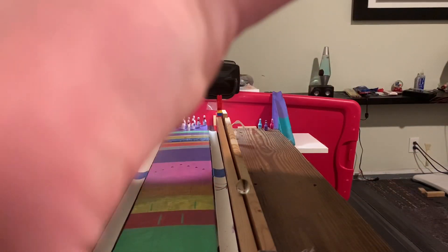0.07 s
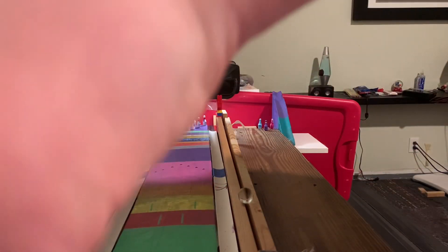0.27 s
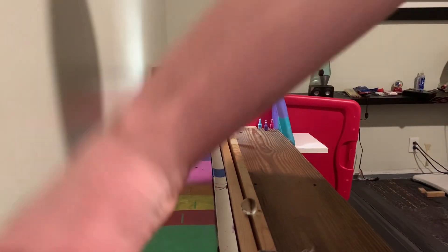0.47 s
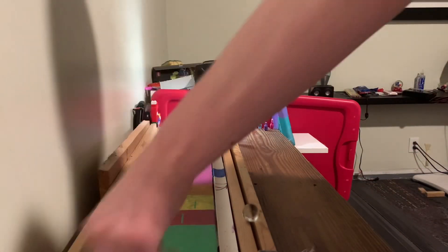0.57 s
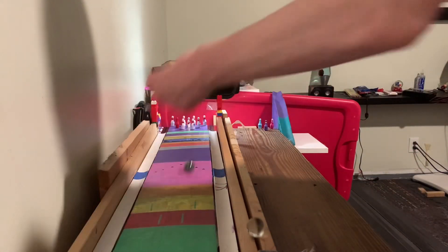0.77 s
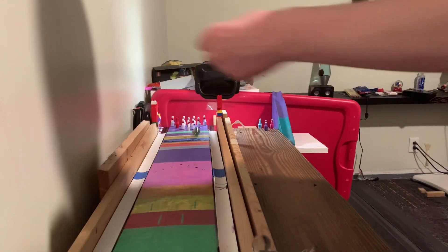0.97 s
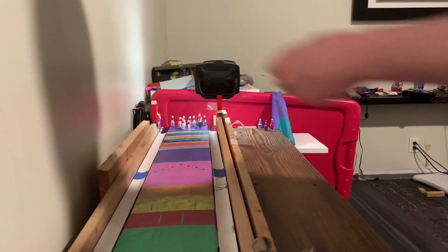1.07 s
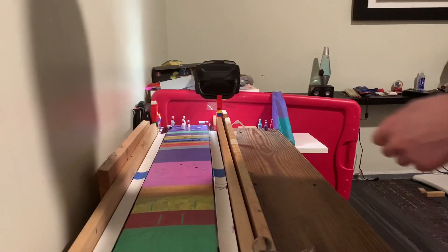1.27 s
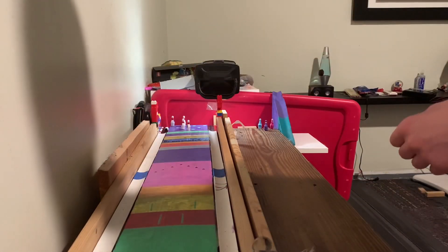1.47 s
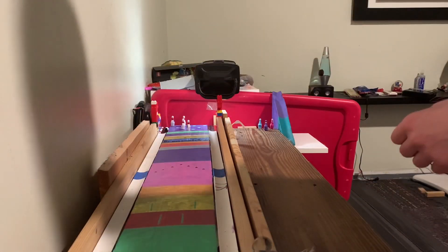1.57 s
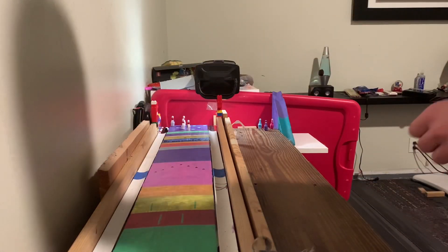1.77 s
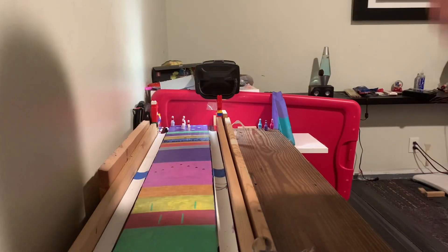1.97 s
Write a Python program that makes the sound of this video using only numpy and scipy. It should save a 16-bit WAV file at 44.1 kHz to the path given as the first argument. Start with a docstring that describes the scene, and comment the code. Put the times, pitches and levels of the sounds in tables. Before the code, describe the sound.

A marble strikes miniature metal pins in a quiet room. Faint ticks from another marble on a side rail come from 0.1 to 0.6 s over low hum. At 0.6 s a steel marble raps onto the nearby wooden lane, bouncing and rolling away. From 1.0 s pins crack, thud against the back box and ring high, thinning by 1.7 s into faint hiss; a dull tock follows at 1.9 s.

```python
"""A quiet room hums (shaped noise) and a second marble ticks on the side rail (noise cracks and rings).
After a short noise swell a steel marble lands on a wooden lane, bounces and rolls away from a phone.
It knocks down small metal pins: noise cracks, thuds in the back box, clatter and rings near 9.6 kHz (fading tones).
A thin high hiss (shaped noise) lies under the end of the clatter, and one dull tock (fading tones) follows.
Two microphone ports hear it all with different phase, along with the room's echo."""
import sys
import numpy as np
from scipy import signal
from scipy.fft import rfft, irfft, next_fast_len
from scipy.io import wavfile

SR = 44100
rng = np.random.default_rng(int(sys.argv[2]) if len(sys.argv) > 2 else 0)


def wrap_up_sound(samples):
    """Save the sound to the file named by the first command line argument, as 16-bit audio."""
    columns = np.atleast_2d(samples).T
    # keep every value between -1 and 1, then stretch to whole-number steps
    tamed = np.clip(columns, -1, 1)
    steps = np.round(tamed * 32767).astype(np.int16)
    wavfile.write(sys.argv[1], SR, steps)


def gain_from_db(level_db):
    """Turn a decibel level (scalar or array-like) into a linear amplitude factor."""
    decades = np.asarray(level_db, float) / 20
    return 10 ** decades


N = 88817
T = np.arange(N) / SR  # time of every sample, in s

# In these tables, t60_s is the time a sound takes to fall by 60 dB.
# steady room hum: overall tone colour (pitch_hz, level_db)
HUM_COLOUR = [(15, -61.5), (25, -30.5), (44, 5), (123, 4), (145, -6.5), (285, -1.5), (317, -45),
              (363, -38.5), (394, -9.5), (911, -17), (1650, -28.5), (16000, -57)]
# narrow bands in the hum (pitch_hz, width_hz, level_db, waver_db)
HUM_BANDS = [(57.3, 5.2, -43, 1.5), (107, 36, -56, -3.5), (281.5, 16.4, -56.5, 3.5), (362, 44, -60, 0),
             (900, 18, -63, 2)]
# how alike left and right hum are; below 0 counts as 0 (pitch_hz, likeness from 0 to 1)
HUM_ALIKE = [(60, 0.7), (130, 1), (290, 0.33), (640, 0.07), (1410, -0.16), (3100, 0.08), (6820, -0.18),
             (15000, 0.22)]
# second marble on the side rail (start_s, level_db, pitch_hz)
RAIL_TICKS = [(0.1141, -39, 3100), (0.304, -64.5, 3220), (0.462, -47.5, 4390), (0.558, -55, 5900),
              (0.588, -45.5, 3940)]
# tones in a rail tick (multiple of its pitch, level_db, t60_s)
TICK_TONES = [(1, -4, 0.066), (1.419, -5, 0.034), (2.2, -11, 0.025)]
# tone colour of the noise swell before the first bounce (pitch_hz, level_db)
LEAD_IN_COLOUR = [(700, -35), (1300, 7), (1550, -11), (1900, 1), (3500, -22.5), (6000, -58)]
# loudness of the rolling marble over time (time_s, level_db)
ROLL_LEVEL = [(.614, -20), (.63, -34.5), (.68, -39), (.75, -42.5), (.85, -40), (.95, -42), (1.05, -43)]
# tones the lane board rings with (pitch_hz, level_db, t60_s)
LANE_TONES = [(376.8, -6, 0.077), (480, -9, 0.06), (522, -5.5, 0.045), (601.6, 0, 0.036), (760, 0, 0.029),
              (861, 2, 0.025), (953, 2, 0.024), (1100, 2.5, 0.056), (1140, -20, 0.03), (1460, 2.5, 0.076),
              (1549, 4, 0.072), (1957, 4.5, 0.015), (1920, -22.5, 0.0093), (2567, -1.5, 0.014),
              (2910, -25, 0.033), (2300, -7.5, 0.022)]
# tone colour of the noisy part of a lane contact (pitch_hz, level_db)
LANE_GRIT = [(300, 9), (1000, 9.5), (2500, -10), (3500, -22), (4700, -24.5), (7000, -37), (10000, -43.5),
             (16000, -35.5)]
# marble bounces on the lane (start_s, level_db, contact_ms, favoured_pitch_hz, grit_level_db)
BOUNCES = [(0.6157, -7.5, 0.085, 2300, -15.5), (0.6165, -6.5, 0.27, 480, -37),
           (0.6204, -36, 0.56, 507, -43), (0.6635, -14, 0.21, 918, -13.5), (0.7015, -19, 0.27, 770, -13.5),
           (.710, -22, 0.26, 607, -42), (.7195, -27, 0.36, 760, -34), (.740, -20, 0.48, 836, -14),
           (.778, -24, 0.17, 760, -37), (0.8072, -15, 0.36, 813, -16.5), (0.8351, -21.5, 0.19, 1017, -32),
           (0.854, -39, 0.15, 1000, -16.5), (.873, -30, 0.33, 800, -49), (0.900, -22.5, 0.42, 700, -26.5),
           (0.919, -37.5, 0.28, 700, -39), (.933, -28.5, 0.21, 1100, -35)]
# hard cracks of marble and pins meeting (start_s, level_db, pitch_hz)
CRACKS = [(0.9894, -17, 2300), (0.995, -42, 3000), (1.01, -28, 8000), (1.0376, -3, 8640),
          (1.0531, -3.5, 6940), (1.084, -38, 6870), (1.11, -6.5, 6640), (1.119, -1.5, 9060),
          (1.1809, -5, 14000), (1.1887, -10, 9100), (1.213, -28, 2530), (1.223, -13, 2530),
          (1.239, -17.5, 7100), (1.381, -21, 5400), (1.395, -11.5, 1820), (1.4794, -25, 5700),
          (1.497, -18, 4240), (1.512, -42, 1980), (1.551, -22, 9100), (1.5752, -18, 2940),
          (1.594, -24, 4240), (1.613, -17, 3860), (1.6523, -17.5, 3000)]
# short body tones of a pin knocking on wood (pitch_hz, level_db, t60_s)
PIN_BODY = [(1100, 3, 0.022), (1820, 11.5, 0.01), (2300, -3.5, 0.018), (2912, 4, 0.028), (3650, -5, 0.025),
            (4240, -9, 0.067), (4824, -5, 0.035), (5646, -4.5, .025), (6540, -1, 0.015)]
# blows on the back box (start_s, level_db, contact_ms, favoured_pitch_hz)
THUDS = [(0.9917, -27.5, 0.4, 850), (1.0434, -21.5, 0.89, 480), (1.047, -14, 0.56, 480),
         (1.1104, -3.5, 0.13, 696), (1.113, -14, 1.02, 197), (1.119, -13.5, 0.47, 500),
         (1.187, -8, 0.25, 900), (1.198, -14, 0.48, 630), (1.203, -10.5, 0.21, 500),
         (1.214, -18, 0.32, 1160), (1.227, -17.5, 0.15, 780), (1.222, -22.5, 1.7, 65),
         (1.242, -49, 0.17, 610), (1.248, -15, 1, 100), (1.262, -24, 1.11, 206), (1.282, -30.5, 0.71, 110),
         (1.299, -23.5, 0.59, 190), (1.315, -50, 0.22, 240), (1.3964, -20.5, 0.18, 503),
         (1.467, -25, 0.17, 710), (1.514, -38, 0.42, 1000), (1.819, -39, 1.24, 289),
         (1.829, -42.5, 1.2, 290), (1.576, -38, 0.15, 1800), (1.655, -38, 0.26, 1310)]
# tones the back box rings with (pitch_hz, level_db, t60_s)
BOX_TONES = [(65, -39, 0.088), (98, -3, 0.063), (190, -6, 0.037), (264, -15, 0.092), (308.4, -17, 0.12),
             (476, 5, 0.025), (630, -0.5, 0.019), (728, 2, 0.043), (902, -2.5, 0.039), (1000, -5.5, 0.065),
             (1087, 1.5, 0.034), (1226, 0, 0.14), (1420, -2.5, 0.045), (1602, 2, 0.021), (1825, 4.5, 0.09),
             (2300, -20, 0.021)]
# loudness of pins tumbling and rolling over time (time_s, level_db)
CLATTER_LEVEL = [(1.036, -38.5), (1.05, -36), (1.10, -38), (1.125, -21.5), (1.17, -34), (1.2, -17.5),
                 (1.25, -26), (1.3, -34), (1.4, -33), (1.55, -36.5), (1.66, -38), (1.75, -44),
                 (1.85, -54.5), (1.93, -57.5), (2.014, -48.5)]
# tone colour of the clatter noise (pitch_hz, level_db)
CLATTER_COLOUR = [(80, -30), (150, 2), (300, 1.5), (700, 1.5), (1500, 0.5), (3000, -3.5), (5000, -10.5),
                  (7000, -15), (11000, -17), (15500, -18.5), (16500, -16.5)]
# tones a metal pin rings with (pitch_hz, level_db, t60_s)
PIN_TONES = [(9571, 0, 0.11), (8720, -24, 0.012), (9545, -5, 0.09), (9800, -22, 0.02), (9620, -7, .07),
             (6500, -11, 0.01), (10900, -14, 0.012), (15100, -8, .012)]
# single pin rings (start_s, level_db)
PIN_RINGS = [(1.0378, -18.5), (1.0505, -10), (1.069, -20.5), (1.084, -18.5), (1.1095, -28), (1.12, -37),
             (1.151, -35), (1.1817, -17.5), (1.196, -17.5), (1.213, -44), (1.239, -12), (1.249, -19),
             (1.273, -19), (1.304, -33), (1.345, -41), (1.385, -40), (1.415, -37), (1.444, -28.5),
             (1.511, -27), (1.5505, -25.5), (1.597, -39), (1.6205, -22)]
# loudness of the thin high hiss over time (time_s, level_db)
HISS_LEVEL = [(1.55, -46), (1.72, -43), (1.9, -53), (1.94, -56), (2.014, -86)]
# tone colour of that hiss (pitch_hz, level_db)
HISS_COLOUR = [(2000, -19.5), (5000, -2), (8000, 7), (15500, 1.5)]
# one dull tock (start_s, level_db)
TOCK = [(1.9277, -25)]
# tones in the tock (pitch_hz, level_db, t60_s)
TOCK_TONES = [(760, -9, 0.14), (937, 5.5, 0.042), (1160, 1, 0.025), (1430, 17, 0.01), (1590, -16, 0.0099)]
# how long the room's echo lasts (pitch_hz, t60_s)
ROOM_T60 = [(100, 0.34), (500, 0.33), (2000, 0.41), (6000, 0.63), (12000, 0.12)]
# how alike left and right echo are (pitch_hz, likeness from 0 to 1)
ROOM_ALIKE = [(100, 0.99), (300, 0.8), (800, 0.11), (2000, 0.02), (8000, 0)]
# phase lead of the first port over the second (pitch_hz, phase_rad)
PORT_PHASE = [(100, 0), (500, 0.5), (1800, 1.44), (4000, 1.51), (9600, 1.84), (15000, 1.8)]
# level of the first port over the second (pitch_hz, level_db)
PORT_BALANCE = [(100, 1.5), (300, 2.5), (700, 5), (1500, 4), (4000, -2), (8000, -0.5), (15000, 1)]
# treble dips and top cut of the finished sound (pitch_hz, level_db)
FINAL_COLOUR = [(7300, 0.5), (8000, -9.5), (8800, -16.5), (9300, 3), (12000, 2), (12800, -12), (14000, -3),
                (14800, -11), (15700, 7), (16200, -49)]


def table(points, hz):
    """Reads a value at each pitch from (pitch, value) points on a log pitch axis."""
    p = np.array(points, float)
    return np.interp(np.log(np.maximum(hz, 1)), np.log(p[:, 0]), p[:, 1])


def curve(rows):
    """Turns (time, dB) rows into a gain over time, practically silent outside them."""
    p = np.array(rows, float)
    return gain_from_db(np.interp(T, p[:, 0], p[:, 1], left=-120, right=-120))


def unit(x):
    """Scales a sound to an rms (average strength) of 1."""
    return x / np.sqrt(np.mean(x ** 2))


def colour(x, points):
    """Filters a sound by (pitch, dB) points."""
    n = x.shape[-1]
    return irfft(rfft(x) * gain_from_db(table(points, np.fft.rfftfreq(n, 1 / SR))), n)


def fade(t, t60):
    """Natural dying away: the level falls 60 dB in t60 seconds."""
    return np.exp(-np.log(1000) * t / t60)


def pair(size, alike):
    """Left and right noise, mixed from shared and opposite parts to be more or less alike at each pitch."""
    likeness = np.clip(table(alike, np.fft.rfftfreq(size, 1 / SR)), 0, 1)
    mid, side = rfft(rng.standard_normal((2, size)))
    mid, side = mid * np.sqrt(1 + likeness), side * np.sqrt(1 - likeness)
    return irfft(np.array([mid + side, mid - side]) / 2, size)


def favour(tones, hz, db, width_oct):
    """Extra dB for the tones near the pitch a blow favours."""
    return db * np.exp(-(np.log2(np.array(tones)[:, :1] / hz) / width_oct) ** 2)


def ring(tones, contact_ms, extra_db=0, spread=0.042, scatter_db=2, size=SR // 4):
    """One blow, peak 1: fading tones, slightly random in pitch and level; a longer contact dulls them."""
    rise_s = 0.00027
    hz, db, t60 = np.array(tones, float).T[:, :, None]
    t = T[:size]
    level_luck, pitch_luck = rng.standard_normal((2, len(hz), 1))
    sign = (-1.) ** np.arange(len(hz))[:, None]  # neighbouring tones start in opposite directions
    gain = sign * gain_from_db(db + extra_db + scatter_db * level_luck)
    waves = np.sin(2 * np.pi * hz * (1 + spread * pitch_luck) * t)
    body = (1 - np.exp(-t / rise_s)) * np.sum(gain * waves * fade(t, t60), 0)
    # the contact is a smooth bell-shaped push
    push = np.exp(-.5 * ((T[:300] * 1000 - 1.5 * contact_ms) / (.5 * contact_ms + 1e-3)) ** 2)
    y = signal.fftconvolve(body, push)
    return y / np.abs(y).max()


def burst(points, t60):
    """A short noise crack with a quick rise and a fade; peak roughly 1."""
    t, rise_s = T[:4096], .0007
    noise = unit(colour(rng.standard_normal(4096), points))
    return noise * fade(t, t60) * (1 - np.exp(-t / rise_s)) / 2


def add(out, s, y):
    """Mixes y in at s seconds."""
    i = int(s * SR)
    out[i:i + len(y)] += y[:len(out) - i]


def grains(per_s, scatter_db):
    """Random clicks of uneven but bounded size; rms 1."""
    hit = rng.random(N) < per_s / SR
    sign = np.sign(rng.standard_normal(N))
    size = gain_from_db(scatter_db * np.minimum(rng.exponential(size=N), 3))
    return unit(hit * sign * size)


def ring_clicks(clicks, body):
    """Lets every click set off the same ring, scaled to unit energy."""
    return signal.fftconvolve(clicks, body / np.linalg.norm(body))[:N]


def patter(clicks, points, t60):
    """Coloured noise that jumps up at every click and fades, like many small puffs."""
    puff = fade(T[:2048], t60)
    power = signal.fftconvolve(clicks ** 2, puff ** 2 / np.sum(puff ** 2))[:N]
    shape = np.sqrt(np.maximum(power, 0))
    y = colour(shape * rng.standard_normal(N), points)
    return y * np.linalg.norm(shape) / np.linalg.norm(y)


def pin_knock(hz, contact_ms, size=SR // 4):
    """A pin knocks on wood: its short body tones ring, strongest near one pitch."""
    return ring(PIN_BODY, contact_ms, favour(PIN_BODY, hz, 23.5, .25), spread=0.0284, size=size)


def hum():
    """Steady room noise with a few narrow bands whose loudness wavers, the same in both ports."""
    hum_db, waver_s = -47.5, .06
    out = gain_from_db(hum_db) * unit(colour(pair(N, HUM_ALIKE), HUM_COLOUR))
    f = np.fft.rfftfreq(N, 1 / SR)
    for hz, width, db, waver_db in HUM_BANDS:
        waver = unit(irfft(rfft(rng.standard_normal(N)) * np.exp(-(f * waver_s) ** 2), N))
        band = unit(irfft(rfft(rng.standard_normal(N)) * np.exp(-((f - hz) / width) ** 2), N))
        out = out + gain_from_db(db + waver_db * waver) * band
    return out


def rail_ticks():
    """A second marble ticks along the side rail: faint noise cracks, each with a softer ring."""
    ring_db = -10  # against the crack
    out = np.zeros(N)
    for s, db, hz in RAIL_TICKS:
        add(out, s, gain_from_db(db) * burst([(hz / 4, -30), (hz, 0), (hz * 2, -8), (16000, -14)], t60=0.026))
        tones = np.array(TICK_TONES) * [hz, 1, 1]
        add(out, s, gain_from_db(db + ring_db) * ring(tones, 0.042, spread=0.0056))
    return out


def lead_in():
    """A short noise swell, mostly 1 to 2 kHz, that stops just before the first bounce."""
    stop_s, rise_s, level_db = .6145, 0.005, -22.5
    noise = unit(colour(rng.standard_normal(N), LEAD_IN_COLOUR))
    return gain_from_db(level_db) * noise * np.exp(-np.abs(T - stop_s) / rise_s) * (T < stop_s)


def rolling():
    """The marble rolls: many tiny bumps ring the board and stir up gritty noise."""
    grit_db = 3  # against the bumps
    bumps = grains(per_s=900, scatter_db=2.5) * curve(ROLL_LEVEL)
    rung = ring_clicks(bumps, ring(LANE_TONES, contact_ms=.55))
    return rung + gain_from_db(grit_db) * patter(bumps, LANE_GRIT, t60=0.029)


def bounces():
    """Each bounce rings the lane board, with a gritty noise edge."""
    out = np.zeros(N)
    for s, db, ms, hz, grit_db in BOUNCES:
        extra = favour(LANE_TONES, hz, 18, .55)
        add(out, s, gain_from_db(db) * ring(LANE_TONES, ms, extra, spread=.012))
        add(out, s, gain_from_db(grit_db) * burst(LANE_GRIT, t60=0.029))
    return out


def cracks():
    """Marble and pins meet hard: a noise crack around one pitch, with a softer pin knock."""
    knock_db = -18  # against the crack
    out = np.zeros(N)
    for s, db, hz in CRACKS:
        shape = [(hz / 16, -56), (hz / 2, -7), (hz, 0), (hz * 16, -28)]
        add(out, s, gain_from_db(db) * burst(shape, t60=0.021))
        add(out, s, gain_from_db(db + knock_db) * pin_knock(hz, 0.046))
    return out


def thuds():
    """Marble and pins hit the back box, and each blow rings its wide, dull tones."""
    out = np.zeros(N)
    for s, db, ms, hz in THUDS:
        add(out, s, gain_from_db(db) * ring(BOX_TONES, ms, favour(BOX_TONES, hz, 10, 1.2), spread=0.044))
    return out


def clatter():
    """Pins tumble: dense knocks stir up noise and faintly ring the metal, the ring ending near 1.7 s."""
    ring_db, stop_s, stop_fade_s = -29, 1.7, .05
    knocks = grains(per_s=700, scatter_db=3.5) * curve(CLATTER_LEVEL)
    ringing_knocks = knocks / (1 + np.exp((T - stop_s) / stop_fade_s))
    bell = ring(PIN_TONES[:5], 0.048, spread=0.0012)
    return patter(knocks, CLATTER_COLOUR, t60=.02) + gain_from_db(ring_db) * ring_clicks(ringing_knocks, bell)


def pin_rings():
    """Single pins ring: a very short contact sets off their high tones."""
    out = np.zeros(N)
    for s, db in PIN_RINGS:
        add(out, s, gain_from_db(db) * ring(PIN_TONES, 0.033, spread=0.0012, scatter_db=3))
    return out


def rattle():
    """Sparse small knocks at random times, each favouring a random body tone of a pin."""
    per_s, scatter_db = 110, 4
    out, gain = np.zeros(N), curve(CLATTER_LEVEL)
    times = np.cumsum(rng.exponential(1 / per_s, 400)) + CLATTER_LEVEL[0][0]
    for s in times[times < T[-1]]:
        hz = PIN_BODY[rng.integers(len(PIN_BODY))][0]
        loudness = gain_from_db(scatter_db * min(rng.exponential(), 3)) * gain[int(s * SR)]
        add(out, s, loudness * pin_knock(hz, 0.057, size=2048))
    return out


def hiss():
    """A thin, fading high hiss under the end of the clatter, made of coloured noise."""
    return curve(HISS_LEVEL) * unit(colour(rng.standard_normal(N), HISS_COLOUR))


def tock():
    """One dull tock: a blow on a few quickly fading tones."""
    out = np.zeros(N)
    for s, db in TOCK:
        add(out, s, gain_from_db(db) * ring(TOCK_TONES, contact_ms=.3))
    return out


def room(x):
    """The room's echo: a noise tail that lasts longest near 6 kHz and dies fastest at the very top."""
    level_db, rise_s = -5.5, 0.0016
    f, t, z = signal.stft(pair(SR // 2, ROOM_ALIKE), SR, nperseg=512)
    tail = signal.istft(z * fade(t, table(ROOM_T60, f)[:, None]), SR)[1]
    # the tail waits for half the rise time, then rises in a straight line
    tail = tail * np.clip(np.arange(tail.shape[1]) / SR / rise_s - .5, 0, 1)
    return gain_from_db(level_db) * signal.fftconvolve(x[None], tail / np.linalg.norm(tail[0]), axes=1)[:, :N]


def ports(x):
    """Each port hears the direct sound with its own phase and level, half the gap going to each."""
    size = next_fast_len(N + SR // 10)
    f = np.fft.rfftfreq(size, 1 / SR)
    half = gain_from_db(table(PORT_BALANCE, f) / 2) * np.exp(.5j * table(PORT_PHASE, f))
    return irfft(rfft(x, size) * np.array([half, 1 / half]), size)[:, :N]


def scene():
    """Direct sound and room echo for every source, over the hum, with a small left gain on the lane."""
    lane_room_db = -0.5
    background = hum()
    rail = rail_ticks()
    lane = lead_in() + rolling() + bounces()
    pins = cracks() + thuds() + clatter() + pin_rings() + rattle() + hiss()
    far = rail + pins + tock()
    pan = gain_from_db(np.array([[.5], [-.5]]))  # left and right, in dB
    return pan * (ports(lane) + gain_from_db(lane_room_db) * room(lane)) + ports(far) + room(far) + background


def low_pass(x):
    """Removes everything above the highest recorded frequency."""
    return signal.sosfilt(signal.butter(12, 16800, fs=SR, output="sos"), x)


def record(dry):
    """The phone rounds the loudest peaks and cuts the deepest bass; the sound has three treble dips and a cut top."""
    ceiling, low_cut_hz = 1.2, 112
    rounded = ceiling * np.tanh(dry / ceiling)
    padded = np.pad(rounded, ((0, 0), (0, SR // 10)))  # keeps the filter from wrapping round
    coloured = colour(padded, FINAL_COLOUR)[:, :N]
    low_cut = signal.butter(2, low_cut_hz, "high", fs=SR, output="sos")
    finished = signal.sosfilt(low_cut, coloured)
    return low_pass(finished)


dry = scene()
out = record(dry)
wrap_up_sound(out)
```